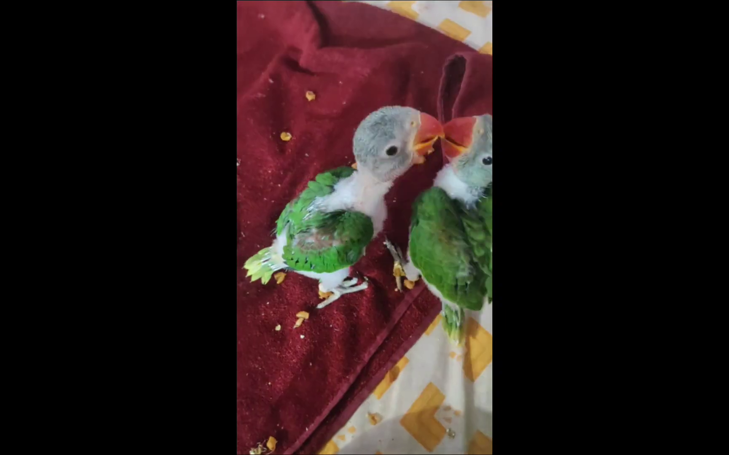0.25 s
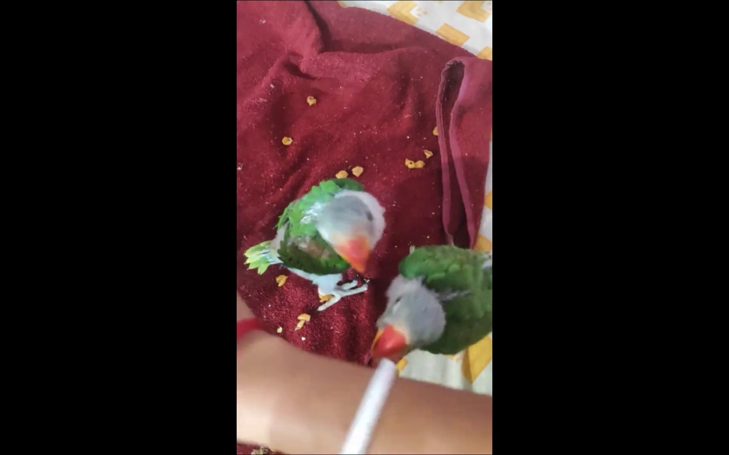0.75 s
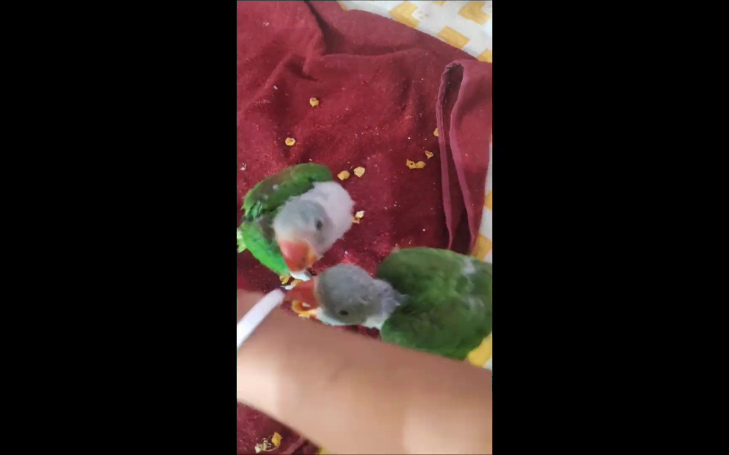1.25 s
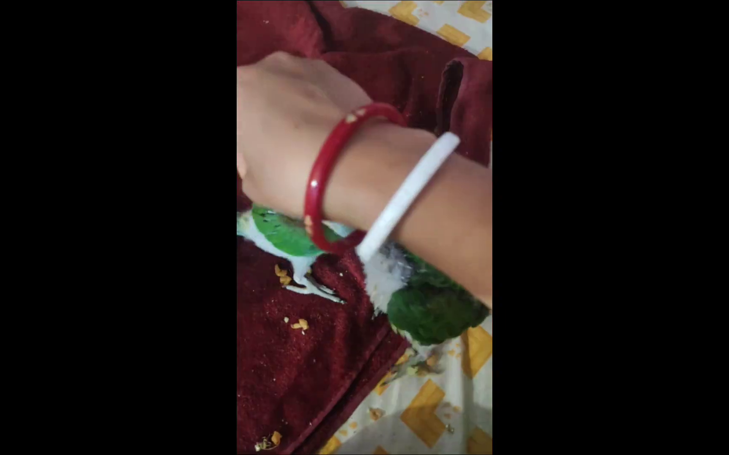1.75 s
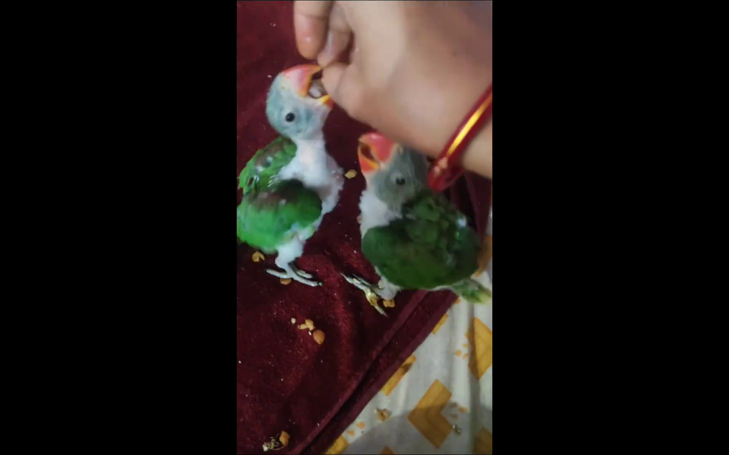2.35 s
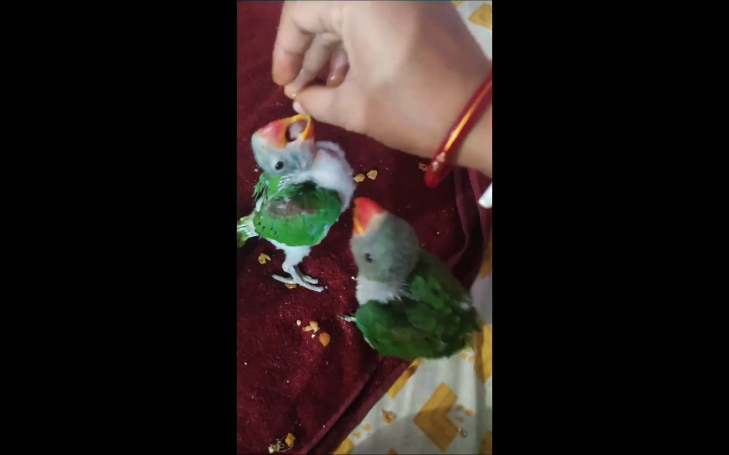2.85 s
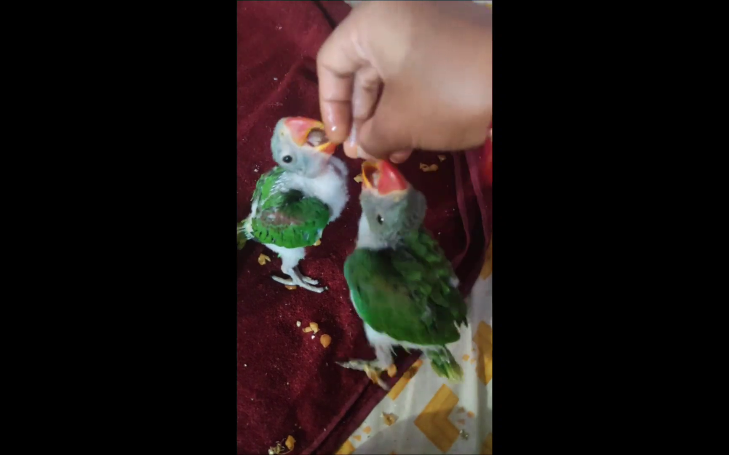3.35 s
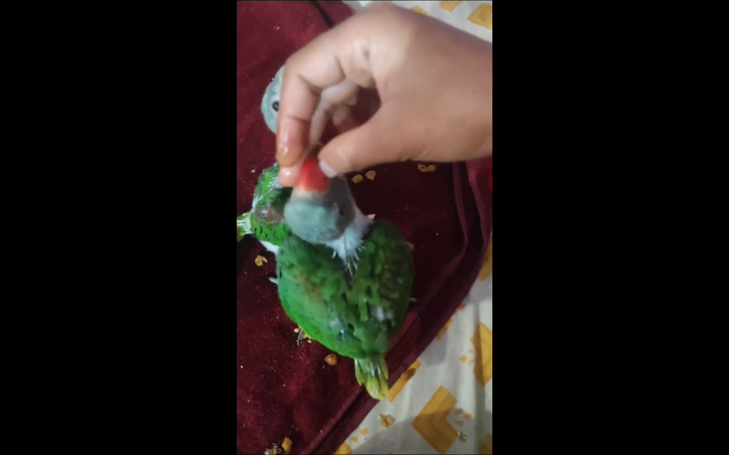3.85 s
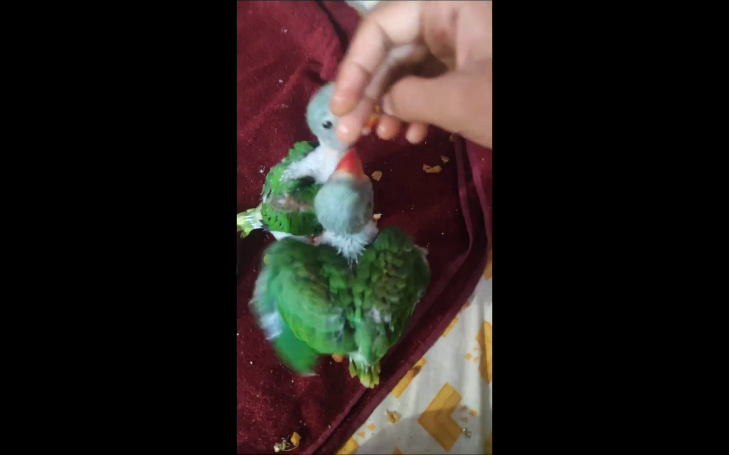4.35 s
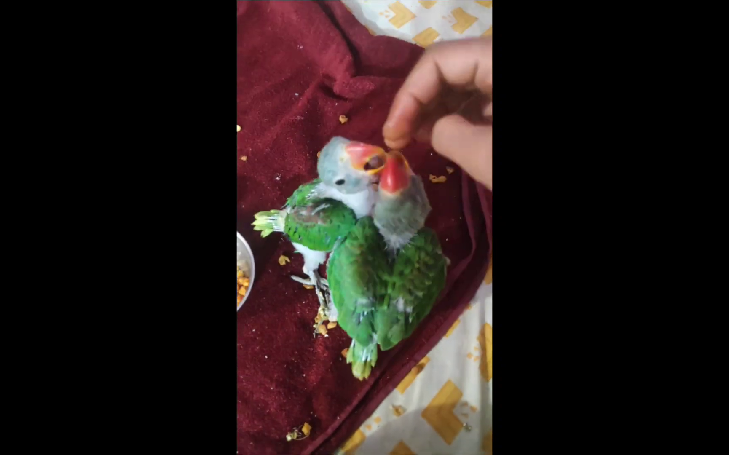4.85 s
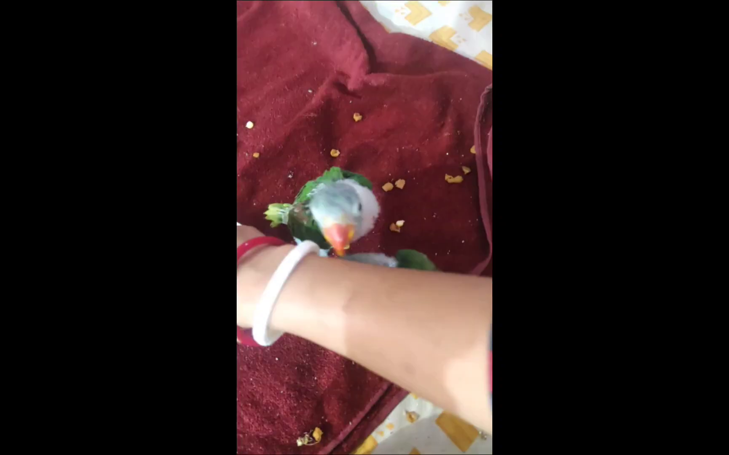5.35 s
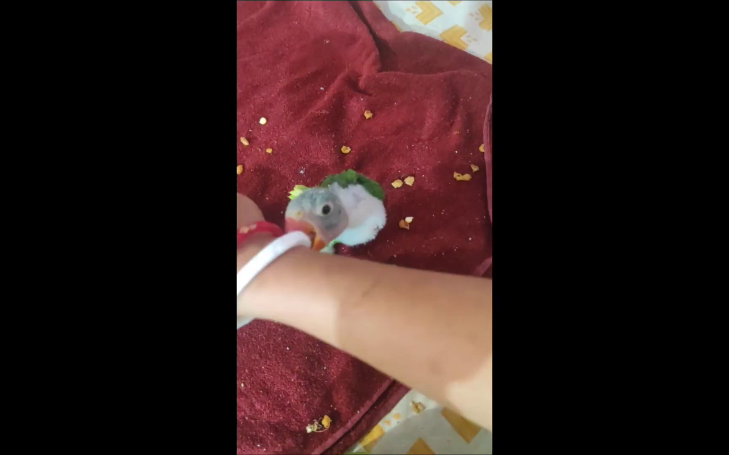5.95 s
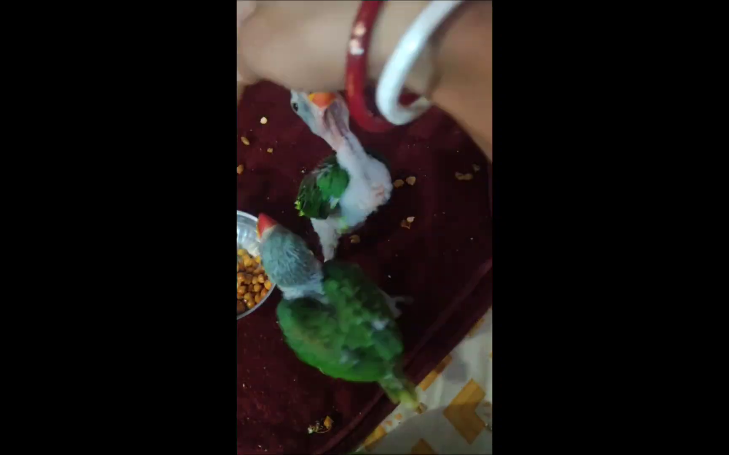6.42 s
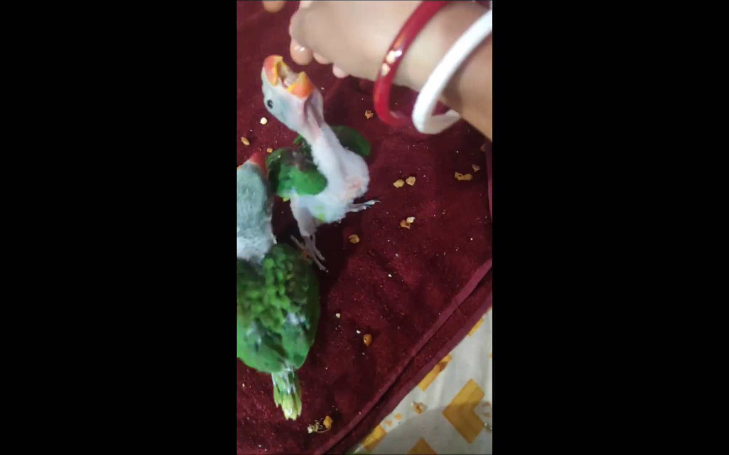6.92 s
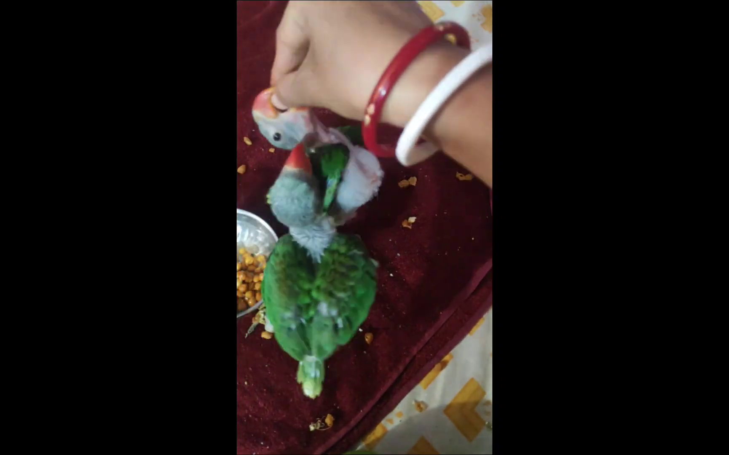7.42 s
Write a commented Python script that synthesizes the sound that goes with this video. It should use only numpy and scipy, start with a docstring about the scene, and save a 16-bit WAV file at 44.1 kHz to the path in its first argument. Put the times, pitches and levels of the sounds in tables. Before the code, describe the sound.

A small, quiet room heard closely in stereo, with a very faint low hush. A parrot chick's squawk is already under way at 0 s, ending around 0.1 s and trailing into a weak, low croak until about 0.17 s. Soft rustles and dull bumps follow; at 1.35 s a loud, dry click with a padded knock comes just before a hoarse squawk at 1.4 s. A clearer, longer-held squawk comes at 2.4 s. Then light feather and cloth rustling, tiny nibbles and very faint ticks until another squawk at 4.8 s. Bright, hard clicks sound at 5.4 and 5.5 s. A last raspy squawk comes at 6.4 s, followed by small high ticks around 6.8, 7.1 and 7.6 s amid gentle rustling. Each call lasts about a quarter second, rises fast to a piercing crest, sags and closes in a rasp, with short room echoes.

```python
"""In a small room, two parrot chicks beg on a cloth while a hand with bangles feeds them seeds. Each squawk is
a pulsing membrane heard through an airway: it rises to a crest, then sags and turns raspy. Beaks, seeds and
bangles tick as short bursts of noise with a high ring; the arm bumps the bedding softly, and once a bangle
knocks low. Feathers and cloth rustle close by as coloured noise that swells and fades, over faint nibbles and a
hush. Echoes of the room follow the calls and the ticks."""
import sys
import numpy as np
from scipy import signal
from scipy.fft import rfft, irfft, next_fast_len
from scipy.io import wavfile
from scipy.ndimage import uniform_filter1d

SR = 44100
rng = np.random.default_rng(int(sys.argv[2]) if len(sys.argv) > 2 else 0)


def generate_wav(sig):
    """Save sig (samples, or channels by samples) to the path in sys.argv[1] as 16-bit PCM at SR."""
    pcm = np.round(np.clip(np.atleast_2d(sig).T, -1, 1) * 32767).astype(np.int16)
    wavfile.write(sys.argv[1], SR, pcm)


N = 338688   # length in samples

# squawks, the first already under way and trailing off in a weak croak: [start t/s, rise t/s, length t/s,
#  crest pitch f/Hz, drop after the crest f/Hz, drop time t/s, sag f/Hz per s, hoarseness 0-1,
#  turns hoarse t/s after the crest, throat level/dB, accent at the crest level/dB,
#  chest at the crest level/dB re throat, chest later level/dB re throat,
#  beak treble level/dB re throat, weakening of a narrow band near 4.8 kHz level/dB (negative strengthens)]
SQUAWKS = [(-0.1, 0.053, 0.21, 1211, 38.6, 0.039, 1089, .27, .03, -31, -1, 0, -1, -5, 0),
           (0.103, 0.018, 0.068, 933, 17.7, 0.041, 1510, 0.32, .005, -50, -4.5, 2, 15, -2, 0),
           (1.416, .052, .233, 1365, 75, 0.036, 1414, .72, .046, -37, 6, -6.5, -10.5, 1, -2.5),
           (2.403, 0.05, .283, 1281, 222, 0.048, 633, 0.04, .1, -31.5, -3, 1.5, -6.5, -0.5, -0.5),
           (4.778, .042, 0.27, 1210, 70, .03, 1020, .21, 0.085, -34.5, 5.5, -2.5, -4.5, -4.5, 8.5),
           (6.405, 0.049, 0.27, 1200, 24.8, 0.033, 1231, .56, .124, -34.5, 6, -5.5, -5, -1, 12.5)]
# colours of the airway in its different shapes: [f/Hz, level/dB]
AIRWAY_A = [(400, -8.5), (700, -14), (1100, -6), (2100, -6.5), (3000, -1), (3700, -13.5), (4700, -14.5),
            (5800, -9), (7100, -6.5), (8200, -4), (9400, -6.5), (10700, -24.5), (13500, -42)]
AIRWAY_B = [(400, -10.5), (700, 2.5), (1100, -1), (2100, -3), (3000, -9.5), (3700, -13), (4700, -13.5),
            (5800, -16), (7100, -3.5), (8200, -8.5), (9400, -19), (10700, -51.5), (13500, -40)]
AIRWAY_C = [(400, -9.5), (700, -10.5), (1100, -1.5), (2100, -8), (3000, -1), (3700, -8.5), (4700, -3),
            (5800, -13), (7100, -1.5), (8200, -8.5), (9400, -14), (10700, -41), (13500, -35.5)]
AIRWAY_D = [(400, -15.5), (700, -13), (1100, -3), (2100, -7), (3000, -0.5), (3700, -9), (4700, -11),
            (5800, -13.5), (7100, -4.5), (8200, -16.5), (9400, -8.5), (10700, -31), (13500, -34.5)]
AIRWAY_E = [(400, -11), (700, -7), (1100, -3), (2100, -3), (3000, 0), (3700, -6.5), (4700, -16),
            (5800, -14.5), (7100, -4), (8200, -6), (9400, -6), (10700, -46), (13500, -35)]
# the airway shape of each squawk; the first two share one
SQUAWK_AIRWAYS = [AIRWAY_A, AIRWAY_A, AIRWAY_B, AIRWAY_C, AIRWAY_D, AIRWAY_E]
# hand and bodies scatter short waves most: [f/Hz, level/dB re direct sound]
SCATTER = [(1000, -10), (2300, -7), (4000, -0.5), (8000, 1.5)]
# colour of the calls from the chicks' direction: [f/Hz, left level/dB, right level/dB]
DIRECTION = [(1000, -1.5, 1.5), (2000, -0.5, -2), (3370, -0.5, -0.5), (4600, -1, 0), (7500, -4.5, 2.5),
             (8850, -1, -7.5), (12000, -5, -1)]
# a chick or the arm shifts on the bedding, before the grain and trim of the rustle:
# [height t/s, swell t/s, fade t/s, feather rustle level/dB, cloth rub level/dB]
SHIFTS = [(.6, 0.4, 0.5, -65, -65.5), (1.106, 0.06, 0.13, -56, -60), (1.298, 0.32, 0.56, -63.5, -69.5),
          (2.12, 0.064, 0.12, -63, -63.5), (2.932, 0.041, 0.14, -60, -63), (3.38, .025, 0.045, -68, -71.5),
          (4.015, 0.44, 0.27, -69, -75), (5.198, 0.17, 0.29, -65, -77), (5.598, 0.21, 0.31, -67.5, -63.5),
          (6.07, 0.022, 0.057, -55, -69.5), (6.335, .03, .05, -66, -89), (6.85, 0.048, 0.067, -59.5, -71),
          (7.228, 0.076, .14, -64.5, -80), (7.598, 0.39, .33, -65.5, -74)]
# colour of the feather rustle, also used for nibbles: [f/Hz, level/dB]
FEATHERS = [(1500, -18.5), (3000, -12), (5000, -9), (6400, -2.5), (7500, -1), (8800, 1.5), (10300, -18),
            (14000, -26.5)]
# colour of the cloth rub: [f/Hz, level/dB]
CLOTH = [(150, 1.5), (350, 1), (700, -3.5), (1600, -9.5), (3000, -15.5), (6000, -34)]
# colour of the faint steady hush: [f/Hz, level/dB]
HUSH = [(12, -25), (20, 9), (49, -4), (103, -2.5), (139, -14.5), (242, -7), (278, -14), (319, -12.5),
        (377, -18.5), (1680, -35.5), (2930, -34), (8620, -40), (15000, -60)]
# soft bumps of the arm on the bedding, and one low bangle knock at 1.355 s, before the microphones' colour:
# [t/s, peak level/dB, f/Hz]
BUMPS = [(0.512, -57, 790), (0.684, -56.5, 900), (1.262, -49.5, 125.8), (1.355, -42, 350),
         (2.267, -64, 796), (2.289, -54, 121.7), (5.731, -57, 1435), (6.825, -56, 118.6)]
# ticks of beaks, seeds and bangles, levels before pan and room:
# [t/s, peak level/dB, ring f/Hz, body level/dB re treble, pan left minus right level/dB, 60 dB decay t/s]
TICKS = [ (1.3528, -19, 6660, -8.5, 4, 0.0044), (1.966, -52.5, 8820, -42.5, 9, 0.018),
         (2.9158, -53, 8220, -11, 4.5, 0.017), (3.3683, -55.5, 8700, -20, 13, 0.016),
         (4.1162, -57.5, 8890, -19, 5, 0.012), (4.5766, -58.5, 6300, -15, 4, 0.016),
         (5.3684, -27, 8940, -14, 1.5, 0.029), (5.3767, -45, 8960, -15, -6, 0.012),
         (5.4821, -31, 8050, -15, 3.5, 0.0037), (5.8248, -54, 6330, -7.5, -4, 0.015),
         (6.8223, -44.5, 8670, -11, -13, 0.014), (6.827, -34.5, 8240, -30.5, 0, 0.0092),
         (6.8554, -44.5, 8740, -27, 11.5, 0.013), (7.1216, -36, 8870, -40, 5.5, 0.023),
         (7.1903, -51.5, 8500, -14, 1, 0.012), (7.5781, -46, 8000, -33, 9, 0.016),
         (7.654, -54, 8700, -21, 14, 0.014)]
# colour of a tick's crack: [f/Hz, level/dB]
CRACK = [(2000, -29.5), (5000, -7.5), (6500, -2), (9500, 2.5), (11000, -9), (14000, -21.5)]
# colour of the room's tail: [f/Hz, level/dB]
TAIL = [(400, -2), (900, 6), (2000, -0.5), (4000, 1.5), (7500, -0.5), (12000, -12)]
# the two microphones differ in colour: [f/Hz, left minus right level/dB]
EAR_TILT = [(60, 6), (380, 14.5), (1000, 7), (2300, 4), (3400, 3), (5000, -3), (7500, 0), (11000, 8.5)]

CUTOFF_HZ = 15400   # nothing much is heard above this
# every squawk opens low, rough and soft, and clears as it climbs to its crest
OPENING_FLAT, OPENING_ROUGH, OPENING_DB, OPENING_BEAK_DB = .23, 1, -13.5, -8
CREST_ROUGH, CREST_WIDTH_S = .035, .026
ACCENT_LEAD_S = 0.0016   # the accent is a short plateau, centred just ahead of the crest
# past the crest the voice is slightly rough, and may break into hoarseness
SETTLED_ROUGH, BREAK_S = .09, .018
# it closes with a rasp; the beak shuts and the pitch collapses as the pressure fails
CLOSING_S, CLOSING_FLAT, CLOSING_ROUGH, CLOSING_BEAK_DB = .012, .38, .65, -14
CLOSING_CHEST_DB = 0.5   # the chest comes forward as the beak shuts
COLLAPSE_S, RELEASE_S, RELEASE_DB = .009, .007, -8
WAVER, WAVER_HZ = .021, 25.18   # the pitch wavers by this share when fully rough
# a narrow band, weaker in some squawks and slightly stronger in others
BAND_DIP_HZ, BAND_DIP_WIDTH_HZ = 4760, 180
SHIFT_RANGE_DB = 20   # how far below its height a shift is at the ends of its swell and fade
# the chicks are never quite still
FIDGET_FEATHER_DB, FIDGET_CLOTH_DB, FIDGET_SWING_DB = -80.5, -78, 1.5
CLOTH_TRIM_DB = -0.5   # applied to every cloth rub
HUSH_DB = -65.5
# faint touches of beaks and claws
NIBBLES_PER_S, NIBBLE_DB, NIBBLE_SPREAD_DB, NIBBLE_T60_S = 6, -69, 2.5, .03
NEAR_T60_S, CALL_NEAR_DB, TICK_NEAR_DB = 0.11, -9.5, -2.5   # quick reflections
ROOM_T60_S, ROOM_DB = 0.25, -16   # the tail


def from_db(db):
    """Decibels to gain."""
    return 10 ** (np.asarray(db) / 20)


def rms_one(x):
    """Scale to an rms (average strength) of 1."""
    return x / np.sqrt(np.mean(x ** 2) + 1e-20)


def at_hz(points, hz):
    """Read a colour table at any frequency, on a log-frequency axis."""
    f, db = np.transpose(points)
    return np.interp(np.log(hz + 1e-9), np.log(f), db)


def coloured(x, spectrum, share=1):
    """Make some frequencies stronger and others weaker, following a smooth colour table."""
    n = x.shape[-1]
    size = next_fast_len(n + 2048)
    hz = np.fft.rfftfreq(size, 1 / SR)
    gain = from_db(share * at_hz(spectrum, hz))
    return irfft(rfft(x, size) * gain, size)[..., :n]


def band(x, low_hz, high_hz, order=2):
    """Keep only the frequencies between two limits."""
    edges_hz = [low_hz, min(high_hz, .45 * SR)]
    sos = signal.butter(order, edges_hz, "band", fs=SR, output="sos")
    return signal.sosfilt(sos, x + 1e-18)


def wander(n, rate_hz):
    """Random drifting of rms 1; a higher rate drifts faster."""
    r = np.exp(-2 * np.pi * rate_hz / SR)
    noise = rng.standard_normal(n + SR // 4)
    return rms_one(signal.lfilter([1], [1, -2 * r, r * r], noise)[-n:])


def evened(x, window_s=0.054):
    """Hold the short-time level at 1."""
    size = max(int(window_s * SR), 2)
    power = uniform_filter1d(uniform_filter1d(x * x, size), size)
    return x / np.sqrt(np.abs(power) + 1e-12)


def add(out, s, x):
    """Mix a sound in at a time; it may have begun earlier."""
    i = int(s * SR)
    x, i = x[..., max(-i, 0):], max(i, 0)
    out[..., i:i + x.shape[-1]] += x[..., :max(N - i, 0)]


def stereo_noise(spectrum, alike):
    """Coloured noise of rms 1, partly shared by both microphones."""
    shared = rng.standard_normal(N)
    separate = rng.standard_normal((2, N))
    return rms_one(coloured(np.sqrt(alike) * shared + np.sqrt(1 - alike) * separate, spectrum))


def gesture(t, rise_s, length_s, crest_hz, drop_hz, drop_s, sag_hz_per_s, hoarse, hoarse_s):
    """Pitch and roughness: climb to a clear crest, drop, sag and grow hoarse, then collapse."""
    opening = np.clip(1 - t / rise_s, 0, 1)
    past = np.maximum(t - rise_s, 0)
    settled = 1 - np.exp(-(past / drop_s) ** 2)
    closing = np.exp((t - length_s) / CLOSING_S)
    pitch = crest_hz - drop_hz * settled - sag_hz_per_s * past
    pitch = pitch * (1 - OPENING_FLAT * opening ** 2)
    pitch = pitch * (1 - CLOSING_FLAT * np.exp((t - length_s) / COLLAPSE_S))
    broken = settled / (1 + np.exp((hoarse_s - past) / BREAK_S))
    rough = CREST_ROUGH + OPENING_ROUGH * np.sin(np.pi / 2 * opening) ** 6
    rough = rough + SETTLED_ROUGH * settled + hoarse * broken + CLOSING_ROUGH * closing
    return pitch, np.clip(rough, .02, 1), opening, closing


def syrinx(pitch, rough, tremor=.018, tremor_hz=170, jitter=.11, jitter_hz=600, hiss=0.12, rattle_db=4.5):
    """A membrane pulses evenly when taut; as it slackens its cycles scatter into a rattling rasp."""
    n = len(pitch)
    # a quick tremor smears the upper partials and leaves the gaps between the low ones empty
    shiver = rms_one(band(rng.standard_normal(n + SR // 10), 25, tremor_hz, order=3)[-n:])
    # in the rasp every cycle has a length of its own
    scatter = jitter * rough ** 1.3 * wander(n, jitter_hz)
    hz = pitch * (1 + tremor * np.sqrt(rough) * shiver + scatter)
    phase = 2 * np.pi * np.cumsum(hz) / SR
    pulses = rms_one(sum(np.cos(k * phase) * (k * hz < CUTOFF_HZ) for k in range(1, 20)))
    air = rms_one(rng.standard_normal(n) * (1 + np.cos(phase)))   # air escapes once a cycle
    broken = np.clip(rough ** 2, 0, .8)
    rattle = from_db(rattle_db * rough ** 2 * np.tanh(wander(n, 200)))
    breath = broken * air + hiss * rough * band(air, 5100, CUTOFF_HZ)
    return (np.sqrt(1 - broken ** 2) * pulses + breath) * rattle


def partial_dip(x, depth_db):
    """Weaken a narrow band near 4.8 kHz, around the crest's fourth partial; a negative depth strengthens it."""
    hz = np.fft.rfftfreq(len(x), 1 / SR)
    dip = np.exp(-((hz - BAND_DIP_HZ) / BAND_DIP_WIDTH_HZ) ** 2)
    return irfft(rfft(x) * from_db(-depth_db * dip), len(x))


def two_ears(x, lag_s=.00028, scatter_t60=0.051, gap_s=0.00069):
    """The left microphone hears the chick later; hand and bodies scatter the call differently to each side."""
    t = np.arange(SR // 20) / SR
    noise = rng.standard_normal((2, len(t)))
    paths = rms_one(noise * from_db(-60 * t / scatter_t60) * (t > gap_s))
    paths = coloured(paths, SCATTER) / np.sqrt(len(t))
    # the direct sound
    paths[0, round(lag_s * SR)] += 1
    paths[1, 0] += 1
    return signal.fftconvolve(x[None], paths, axes=1)[:, :len(x)]


def squawk(row, airway, flutter_db=2.56, chest_top_hz=1600, throat_top_hz=6200, chest_shift_s=0.054):
    """The syrinx drives chest, throat and beak registers, whose shares move as the beak opens."""
    _, rise_s, length_s, *shape, level_db, accent_db, chest_crest_db, chest_late_db, beak_db, dip_db = row
    t = np.arange(0, length_s, 1 / SR)
    pitch, rough, opening, closing = gesture(t, rise_s, length_s, *shape)
    pitch = pitch * (1 + WAVER * np.sqrt(rough) * wander(len(t), WAVER_HZ))
    voice = two_ears(partial_dip(coloured(syrinx(pitch, rough), airway), dip_db))

    near_crest = np.exp(-((t - rise_s) / chest_shift_s) ** 2)
    chest = chest_late_db + (chest_crest_db - chest_late_db) * near_crest + CLOSING_CHEST_DB * closing
    beak = beak_db + OPENING_BEAK_DB * opening + CLOSING_BEAK_DB * closing
    registers = [(350, chest_top_hz, chest), (chest_top_hz, throat_top_hz, 0), (throat_top_hz, CUTOFF_HZ, beak)]
    call = sum(evened(band(voice, low, high, order=5)) * from_db(db) for low, high, db in registers)

    accent = accent_db * np.exp(-((t - rise_s + ACCENT_LEAD_S) / CREST_WIDTH_S) ** 4)
    release = RELEASE_DB * np.exp((t - length_s) / RELEASE_S)
    effort_db = level_db + OPENING_DB * opening ** 2 + accent + release
    flutter = flutter_db * np.tanh(wander(len(t), 28))
    edges = np.clip(t / .003, 0, 1) * np.clip((length_s - t) / .002, 0, 1)
    return call * edges * from_db(effort_db + flutter)


def chicks():
    """All the begging calls, coloured by their direction at each microphone."""
    out = np.zeros((2, N))
    for row, airway in zip(SQUAWKS, SQUAWK_AIRWAYS):
        add(out, row[0], squawk(row, airway))
    hz, *sides = np.transpose(DIRECTION)
    return np.array([coloured(ear, np.transpose([hz, db])) for ear, db in zip(out, sides)])


def stirring():
    """Gains of feathers and cloth: each shift swells and dies away, over constant faint fidgeting."""
    t = np.arange(N) / SR
    fidget_db = np.array([[FIDGET_FEATHER_DB], [FIDGET_CLOTH_DB]]) + FIDGET_SWING_DB * wander(N, 7.1)
    power = from_db(fidget_db) ** 2
    for s, swell_s, fade_s, feather_db, cloth_db in SHIFTS:
        away = np.maximum((s - t) / swell_s, (t - s) / fade_s)
        shape = from_db(-SHIFT_RANGE_DB * np.minimum(away, 10))
        power = power + (from_db([[feather_db], [cloth_db]]) * shape) ** 2
    return np.sqrt(power)


def rustle(grain_db=2.0, rub_db=3.5):
    """Feathers and cloth catch and slip in small uneven bursts."""
    feathers, cloth = stirring()
    barbs = stereo_noise(FEATHERS, alike=0.05) * feathers * from_db(grain_db * wander(N, 120))
    weave = stereo_noise(CLOTH, alike=0.17) * cloth * from_db(CLOTH_TRIM_DB + rub_db * wander(N, 40))
    return barbs + weave


def faint_hush():
    """A faint background of steady coloured noise."""
    return from_db(HUSH_DB) * stereo_noise(HUSH, alike=0.47)


def nibbles():
    """Tiny scratchy touches at random moments, each a burst of noise that dies away."""
    strength = from_db(NIBBLE_DB + NIBBLE_SPREAD_DB * rng.standard_normal(N))
    touches = (rng.random(N) < NIBBLES_PER_S / SR) * strength
    decay = from_db(-60 / (NIBBLE_T60_S * SR))   # gain from one sample to the next
    return stereo_noise(FEATHERS, alike=0.27) * signal.lfilter([1], [1, -decay], touches + 1e-18)


def bumps(t60=0.038):
    """Low knocks of the arm on the bedding and of a bangle: bursts of noise that die away quickly."""
    out, t = np.zeros(N), np.arange(SR // 5) / SR
    for s, peak_db, hz in BUMPS:
        burst = rng.standard_normal(len(t)) * from_db(-60 * t / t60)
        thud = band(burst, hz / 2.1, hz * 1.3)
        add(out, s, thud / np.abs(thud).max() * from_db(peak_db))
    return out


def ticks(snap_t60=0.01, snap_db=-11.0, ring_db=5.0):
    """A hard contact: a bright crack, a duller knock and one narrow high ring, dying away together."""
    out, t = np.zeros((2, N)), np.arange(SR // 10) / SR
    for s, peak_db, hz, body_db, pan_db, t60 in TICKS:
        grit = rng.standard_normal((3, len(t)))
        crack = rms_one(coloured(grit[0], CRACK))
        knock = rms_one(band(grit[1], 1400, 3700)) * from_db(body_db)
        ring = rms_one(band(grit[2], hz / 1.05, hz * 1.05)) * from_db(ring_db)
        decay = from_db(-60 * t / t60) + from_db(snap_db - 60 * t / snap_t60)
        tick = (crack + knock + ring) * decay
        side_db = pan_db * np.array([[.5], [-.5]])
        add(out, s, tick / np.abs(tick).max() * from_db(peak_db + side_db))
    return out


def room(x, near_db, near_gap_s=0.0047, far_gap_s=0.0078):
    """Direct sound, quick reflections from the bed and nearby walls, then a tail; each side hears its own."""
    t = np.arange(int(.7 * SR)) / SR
    near = rng.standard_normal((2, len(t))) * from_db(-60 * t / NEAR_T60_S) * (t > near_gap_s)
    far = coloured(rng.standard_normal((2, len(t))), TAIL)
    far = far * from_db(-60 * t / ROOM_T60_S) * (t > far_gap_s)
    echoes = (from_db(near_db) * rms_one(near) + from_db(ROOM_DB) * rms_one(far)) / np.sqrt(len(t))
    wet = signal.fftconvolve(x, echoes, axes=1)[:, :N]
    return (x + wet) / np.sqrt(1 + from_db(near_db) ** 2)   # make up for the added reflections


def scene():
    """Calls and ticks in the room, over rustle, nibbles, bumps and a faint hush."""
    sides = np.array([[.5], [-.5]])   # half the difference in colour goes to each microphone
    calls = room(chicks(), CALL_NEAR_DB)
    close = calls + rustle() + faint_hush() + nibbles() + bumps()
    return coloured(close, EAR_TILT, share=sides) + room(ticks(), TICK_NEAR_DB)


def record(dry):
    """The top is cut steeply."""
    return signal.sosfilt(signal.ellip(10, .1, 80, CUTOFF_HZ, fs=SR, output="sos"), dry)


dry = scene()
out = record(dry)
generate_wav(out)
```